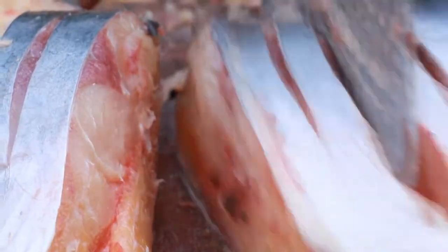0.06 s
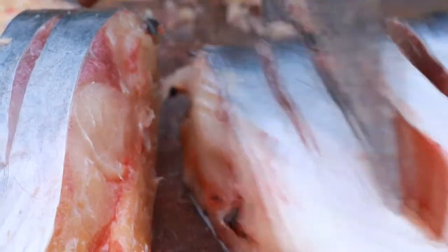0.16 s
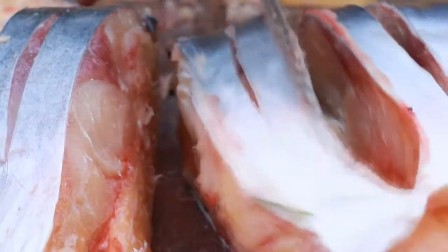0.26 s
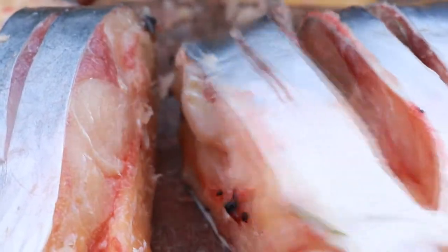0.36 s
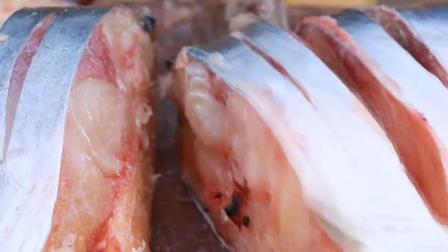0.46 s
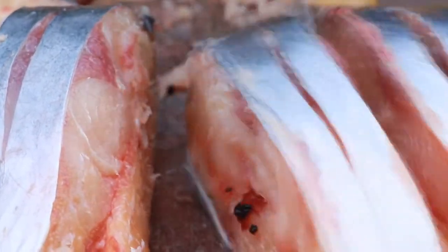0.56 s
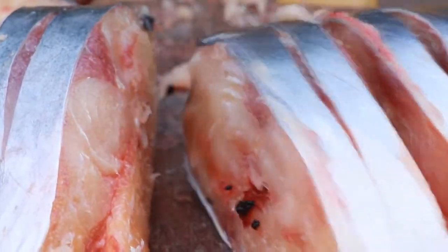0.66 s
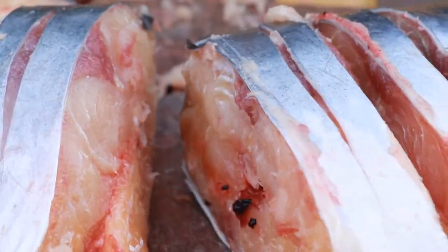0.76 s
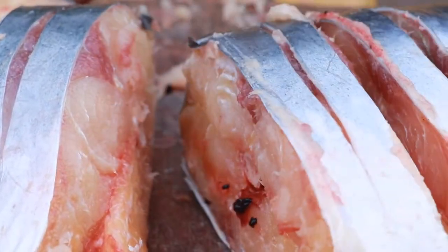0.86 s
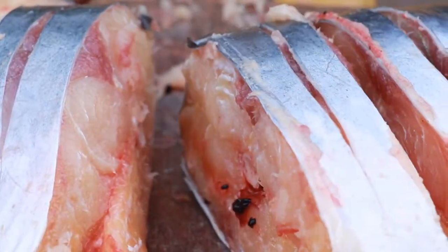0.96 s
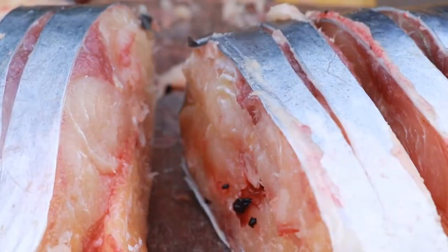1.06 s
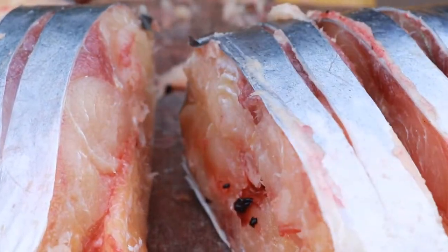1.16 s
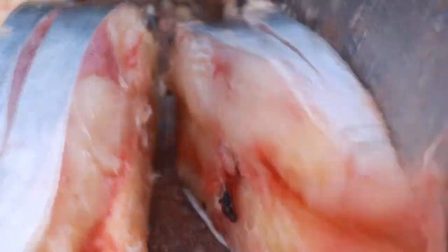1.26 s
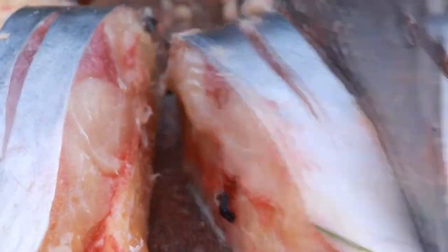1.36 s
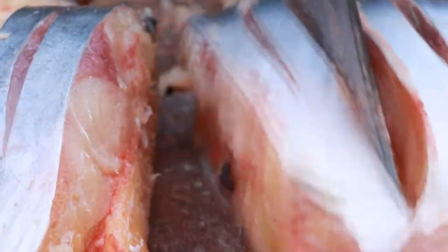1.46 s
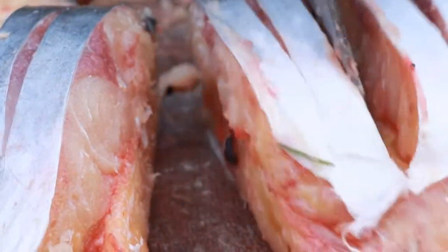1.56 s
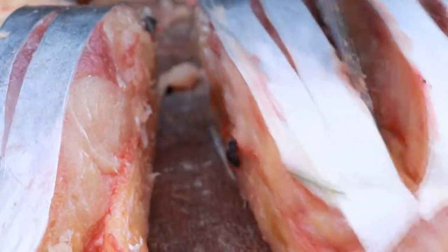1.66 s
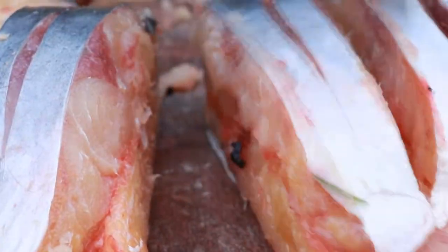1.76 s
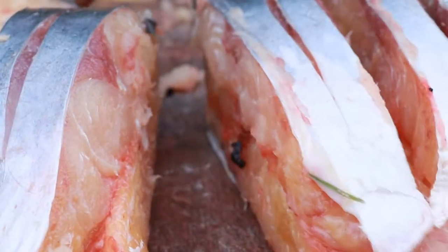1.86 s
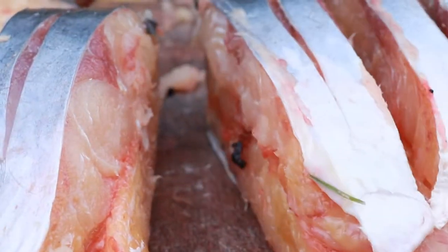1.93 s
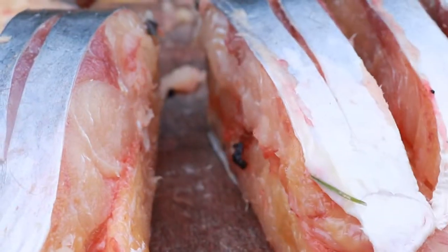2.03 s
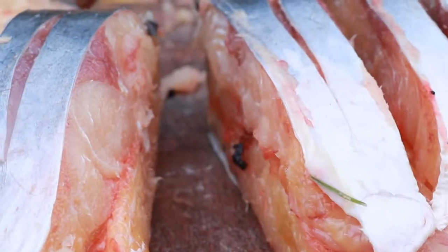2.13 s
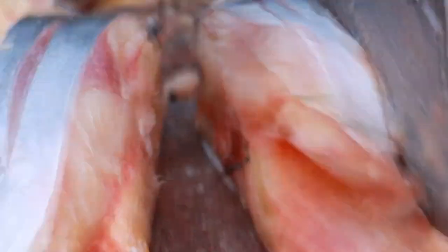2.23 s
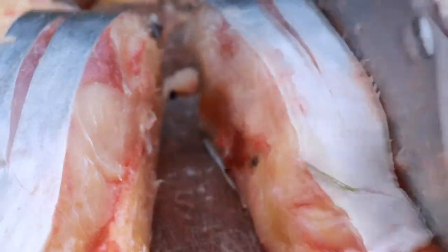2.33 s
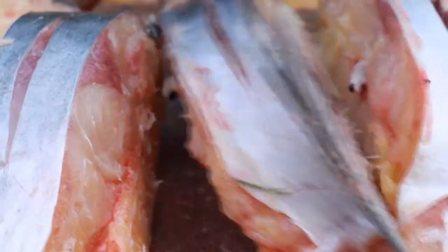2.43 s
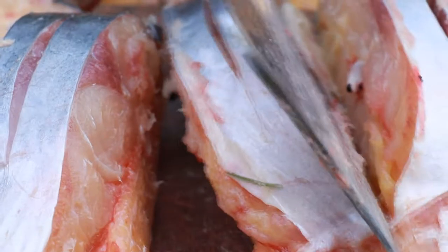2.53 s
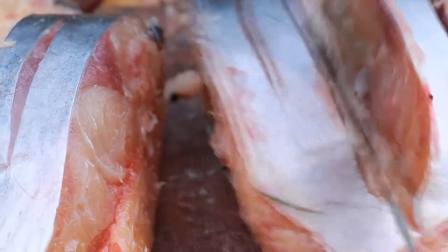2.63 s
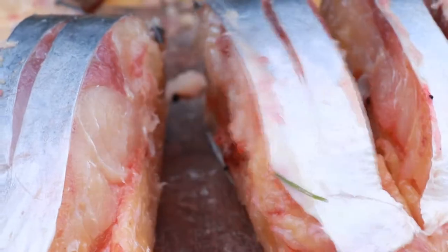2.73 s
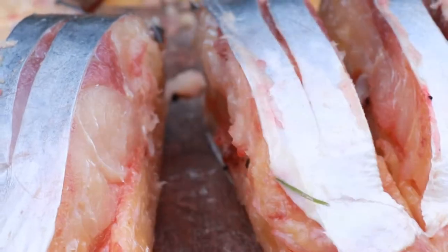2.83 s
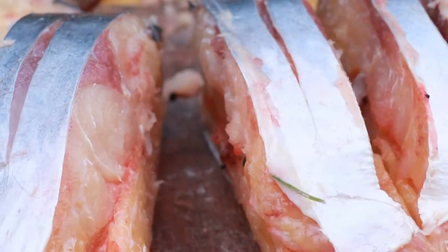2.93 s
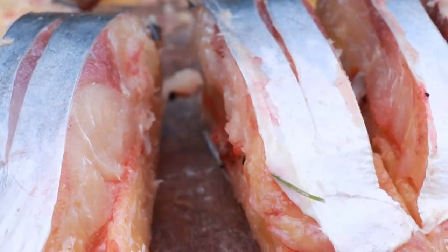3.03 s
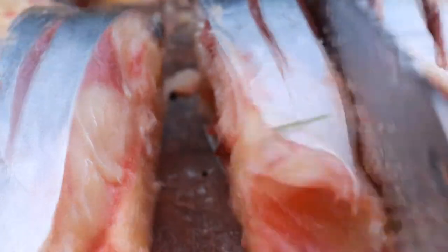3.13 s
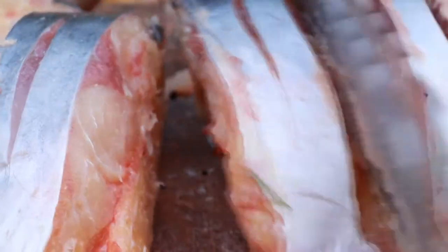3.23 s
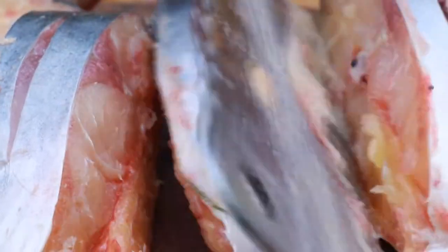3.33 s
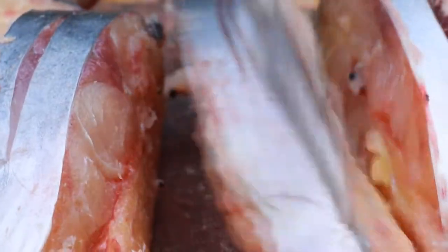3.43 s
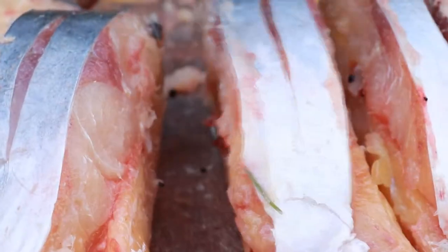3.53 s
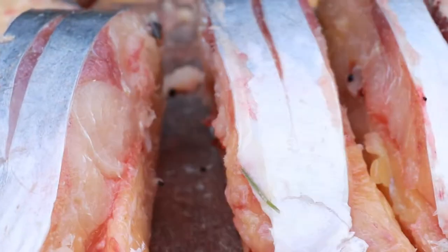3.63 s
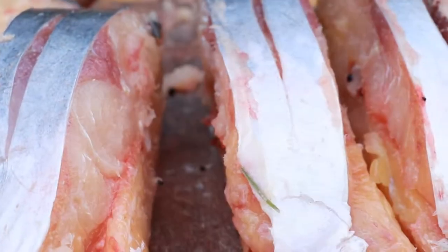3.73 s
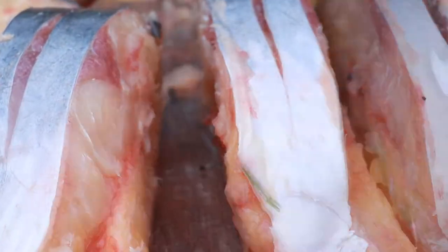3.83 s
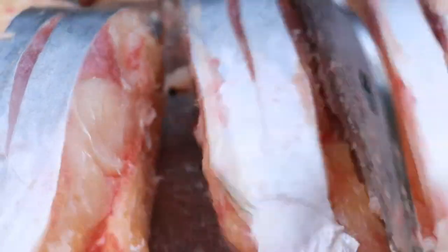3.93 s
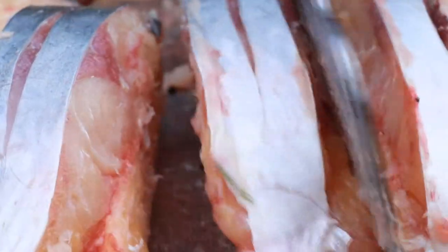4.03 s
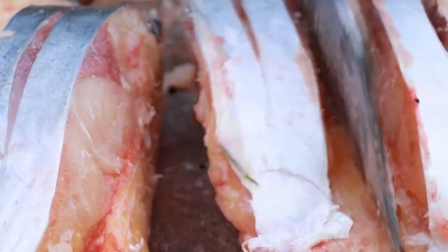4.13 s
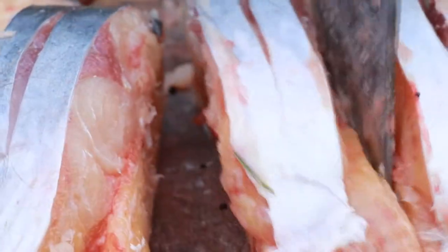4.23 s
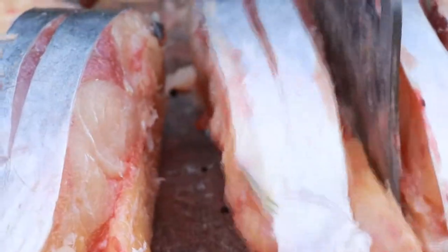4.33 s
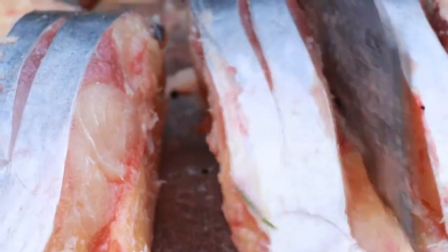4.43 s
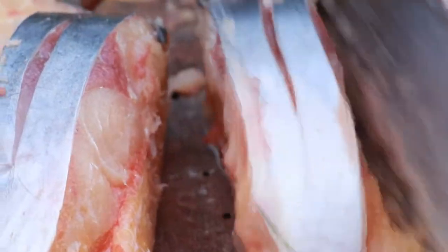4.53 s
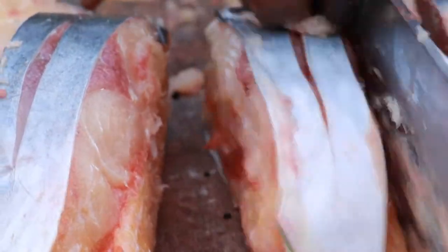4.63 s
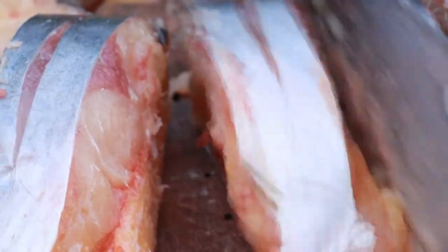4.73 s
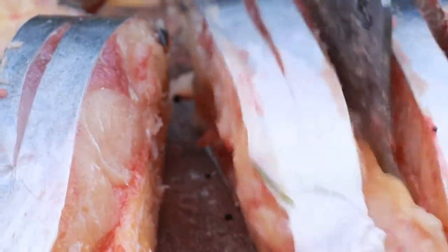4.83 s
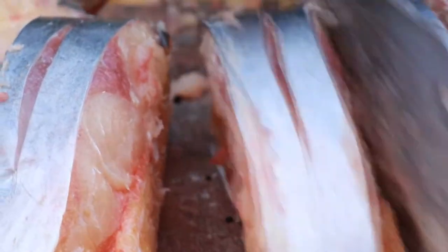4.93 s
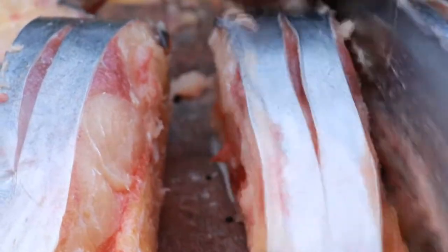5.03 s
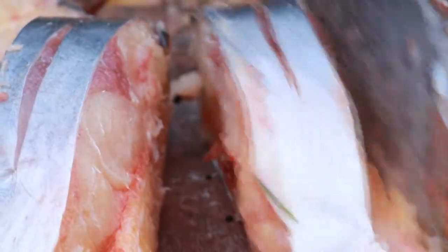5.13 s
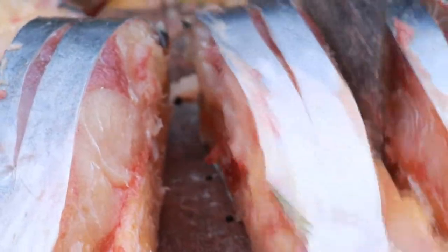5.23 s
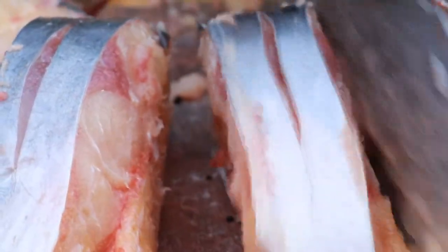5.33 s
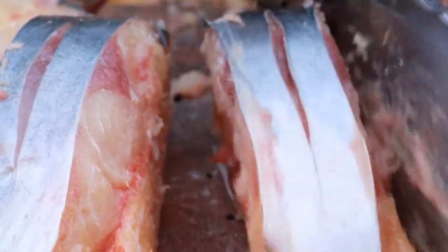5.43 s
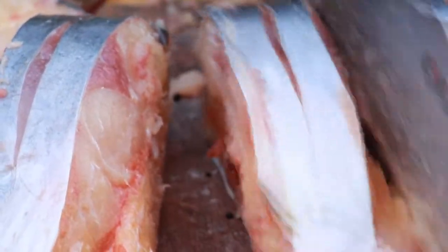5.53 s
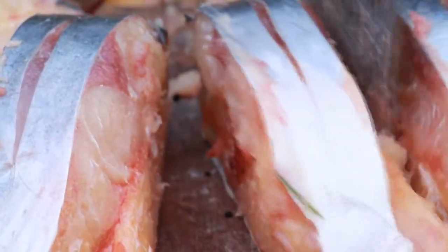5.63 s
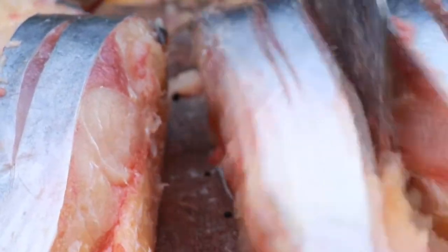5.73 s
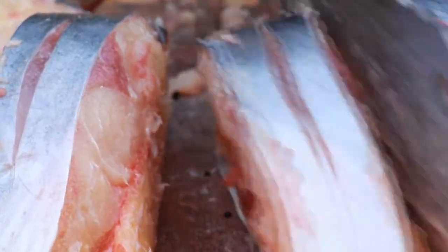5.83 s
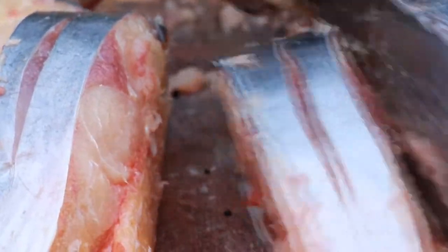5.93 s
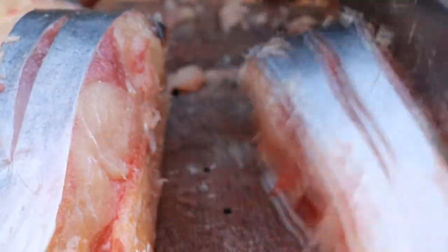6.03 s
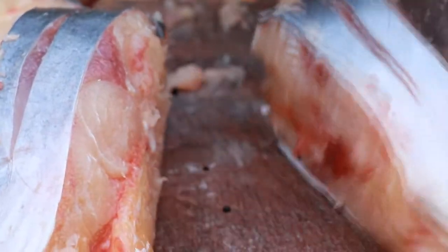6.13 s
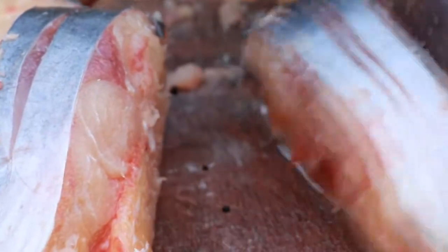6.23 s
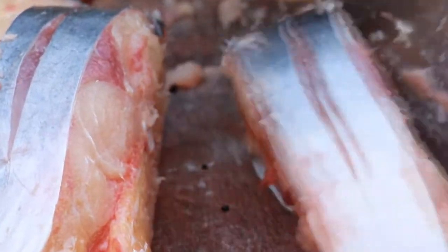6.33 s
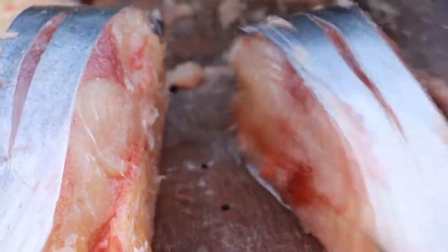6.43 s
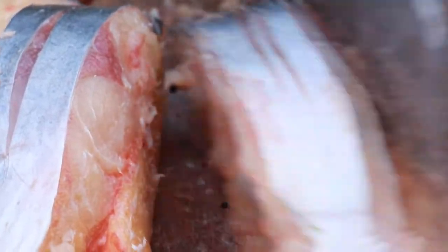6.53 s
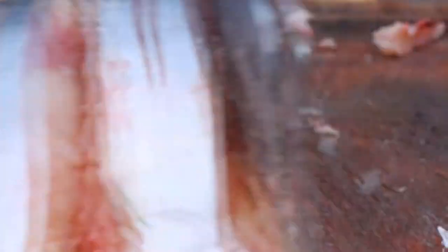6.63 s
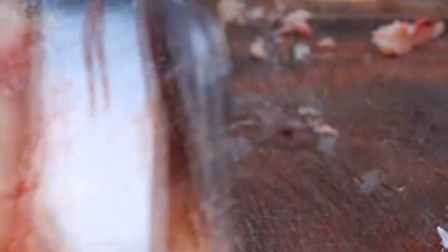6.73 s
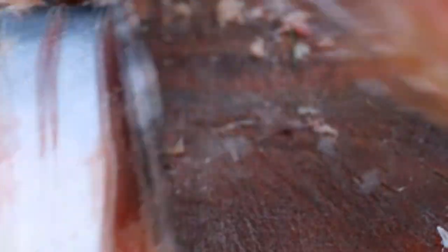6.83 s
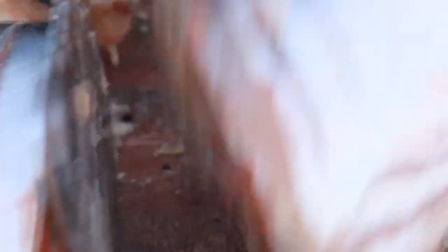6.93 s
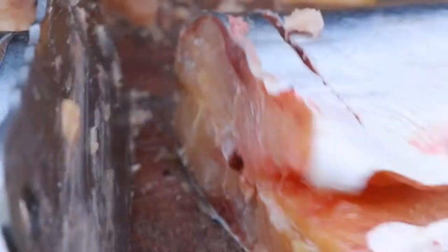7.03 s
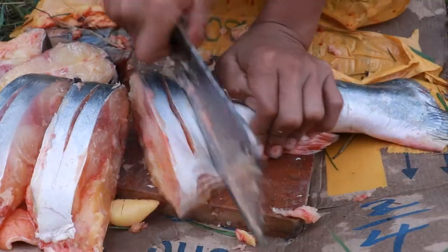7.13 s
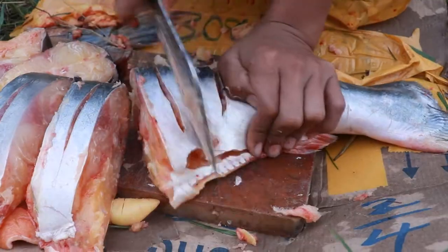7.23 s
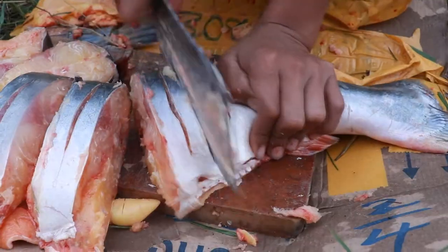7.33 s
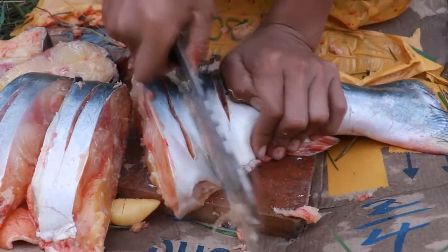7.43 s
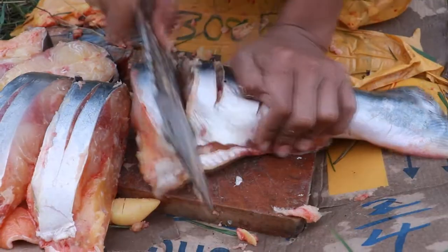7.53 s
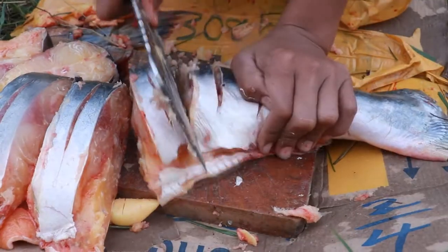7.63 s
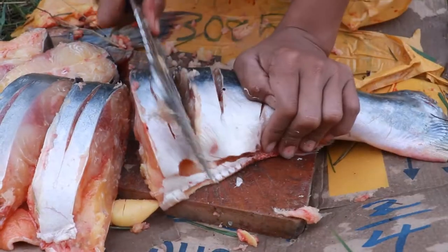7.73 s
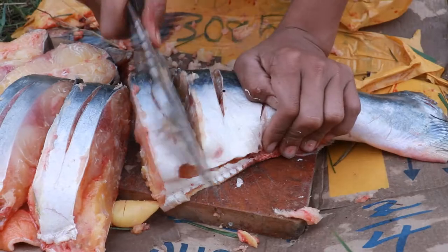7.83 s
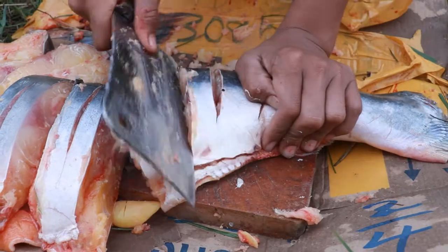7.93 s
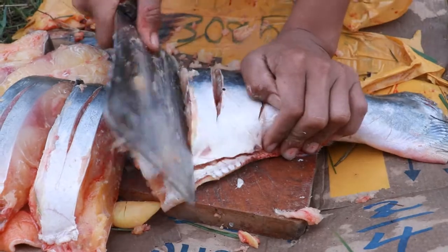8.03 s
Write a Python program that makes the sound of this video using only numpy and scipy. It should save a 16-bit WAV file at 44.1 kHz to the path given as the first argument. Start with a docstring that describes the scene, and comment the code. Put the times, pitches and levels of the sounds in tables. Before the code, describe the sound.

Four crunching knife blows through fish onto wood, a second apart, then rasping sawing, a flopping slap and wet rustles, with an engine idling far off.

```python
"""Outdoors, at a wooden board close by: a heavy knife chops a big fish into steaks.
Four blows excite decaying noise for flesh and bone and the damped modes of the board; the blade saws
by friction, a steak slaps down and is scraped aside. Wet flesh rustles, ticks and pops as noise grains.
An engine idles some way off as harmonics of its firing rate, over rumble and hiss, with faint echoes.
A limiter ducks everything after each blow; near the end the sound breaks off briefly."""
import sys
import numpy as np
from scipy import signal
from scipy.fft import rfft, irfft, next_fast_len
from scipy.io import wavfile
from scipy.ndimage import map_coordinates

SR = 44100
rng = np.random.default_rng(int(sys.argv[2]) if len(sys.argv) > 2 else 0)


def master_out(mix):
    """Clip the mix to full scale and print it as 16-bit PCM to the path in sys.argv[1]."""
    frames = np.transpose(np.atleast_2d(mix))
    ceiling = np.clip(frames, -1, 1)
    pcm = np.round(ceiling * 32767).astype(np.int16)
    wavfile.write(sys.argv[1], SR, pcm)


N = 356328  # length in samples

# All level_db and gain_db columns are relative levels.
# Spectra of the surroundings: hz [Hz], gain_db [dB]
RUMBLE_SPECTRUM = [(15, -34), (28, -25), (43, -7), (81, -8), (140, -9.5), (300, -17.5), (480, -24),
                   (700, -41.5), (6000, -42.5), (12000, -65)]
AIR_SPECTRUM = [(260, -44), (450, -20), (664, -2.5), (705, -10), (759, -7.5), (950, -6), (1890, -9.5),
                (2430, -10), (3140, -13.5), (3700, -13.5), (6150, -32), (7600, -17), (8700, -10),
                (9700, -17), (10900, -14.5), (11800, -24), (16000, -60)]
# Engine firing rate: time_s [s], firings_per_s [1/s]
FIRING_RATE = [(0, 27.9), (1, 27.4), (2, 27), (4, 26.6), (5.3, 26.2), (7.1, 26)]
# Engine exhaust orders: order [multiple of the firing rate], level_db [dB]
EXHAUST_ORDERS = [(4, -10), (5, -2), (6, -4), (8, -14), (12, -16), (14, -19.5)]
# Spectrum of the exhaust noise: hz [Hz], gain_db [dB]
CHUFF_SPECTRUM = [(60, -36), (140, 6.5), (240, -2.5), (380, 4), (480, -7.5), (800, -21), (6000, -25),
                  (12000, -55)]
# Engine level: time_s [s], level_db [dB]
ENGINE_LEVEL = [(0, -41.5), (1.7, -37.5), (2.9, -37.5), (4.4, -37.5), (6.1, -38), (7.1, -45)]
# Left-right correlation of the surroundings, of rubbing and of a blow: hz [Hz], correlation [0-1]
AIR_CORRELATION = [(130, 0.96), (300, 0.74), (640, 0.61), (1400, 0.17), (3000, 0.083)]
RUB_CORRELATION = [(450, 0.98), (1100, 0.7), (3000, 0.56), (5000, 0.66), (8000, 0.049), (14000, 0.096)]
BLOW_CORRELATION = [(400, 0.03), (1200, 1), (5000, 0.97), (14000, 0.16)]
# Channel balance of the board: hz [Hz], left_minus_right_db [dB]
BOARD_BALANCE = [(200, -1.5), (1200, -1), (2400, -4.5), (5000, -4), (8000, -7), (11000, -9.5), (15000, -10)]
# Blade drawn out of the flesh, or a hand shifting its grip:
# start_s [s], length_s [s], fastest_at [share of length], rub_level_db [dB], wet_level_db [dB]
RUBS = [(0.018, 0.2, 0.42, -31.5, -37), (0.2, 0.36, 0.46, -45.5, -43), (0.556, .16, 0.52, -49.5, -47),
        (1.437, 0.23, 0.56, -46.5, -44), (1.711, 0.12, 0.79, -43, -45), (2.434, 0.13, 0.25, -46.5, -45.5),
        (2.64, .1, 0.58, -49, -45.5), (3.359, 0.16, 0.84, -45.5, -46.5), (4.089, 0.25, 0.92, -48, -45),
        (4.45, 1.3, 0.37, -43, -51), (6.006, 0.37, 0.92, -44.5, -49), (6.452, 0.45, 0.37, -39, -42.5),
        (7.115, .11, 0.39, -41, -46), (7.22, 0.15, 0.55, -39.5, -42), (7.38, 0.2, 0.22, -37.5, -42.5),
        (7.547, 0.16, 0.65, -38, -36.5), (7.672, 0.5, 0.15, -54, -50)]
# Spectra of rubbed skin and of wet hiss: hz [Hz], gain_db [dB]
RUB_SPECTRUM = [(250, -8), (420, 12.5), (700, -0.5), (1500, 5.5), (2400, 4.5), (3600, 4), (5000, -3),
                (8000, -28)]
WET_SPECTRUM = [(2940, -11), (5000, -9.5), (6890, -3), (11900, -6.5), (15000, -17), (16000, -28.5)]
# Flesh peeling off blade or board and settling in its slime: start_s [s], length_s [s], pop_level_db [dB]
PEELS = [(3.29, .06, -29), (6.28, .04, -25.5), (6.392, .055, -34)]
# Clear snaps of sticky skin and taps of the blade: time_s [s], level_db [dB], pitch_hz [Hz]
TICKS = [(0.0838, -10.5, 1950), (0.106, -26, 4500), (0.1445, -20, 10800), (0.231, -24.5, 11900),
         (0.279, -27, 3150), (0.519, -23, 4140), (1.1997, -26, 2420), (1.7915, -20, 7300),
         (2.1976, -23, 2340), (2.6742, -13, 2590), (2.721, -18, 7650), (3.0472, -22.5, 2370),
         (3.8216, -25.5, 2190), (4.2722, -18, 2980), (4.5355, -15, 1450), (4.9204, -16, 1430),
         (5.65, -20, 1730), (6.19, -24, 7500), (6.316, -24, 3270), (6.2513, -17.5, 7400),
         (7.0526, -18, 1940), (7.4044, -17, 2900), (7.439, -26, 2690), (7.601, -16.5, 7650),
         (7.9603, -12.5, 6540)]
# Squeaks of the blade leaving the flesh: start_s [s], length_s [s], level_db [dB], pitch_hz [Hz]
SQUEAKS = [(1.799, 0.024, -38, 6750), (3.495, 0.019, -40, 6200)]
# Strokes of the blade, sawing and then pushing pieces aside: start_s [s], length_s [s],
# fastest_at [share of length], groan_level_db [dB], rasp_level_db [dB], from_hz [Hz], to_hz [Hz] (resonance)
STROKES = [(4.41, 0.16, 0.34, -42.5, -47, 1500, 1500), (4.524, 0.23, 0.48, -23.5, -25.5, 2420, 1730),
           (4.724, 0.19, 0.71, -28, -26.5, 1790, 3150), (4.91, 0.2, 0.68, -24, -26.5, 2150, 2400),
           (5.103, 0.17, 0.62, -25.5, -30, 2980, 3180), (5.238, 0.082, 0.46, -27, -29, 1570, 1550),
           (5.314, 0.23, 0.49, -26.5, -26, 1570, 2920), (5.526, 0.14, 0.47, -39, -34.5, 2790, 2880),
           (5.628, 0.15, 0.27, -28, -29, 1750, 1590), (5.765, 0.3, 0.38, -31, -29, 1800, 2510),
           (5.942, 0.051, .6, -20.5, -50, 2300, 2000), (5.961, .23, .2, -33, -46.5, 2200, 1750),
           (6.436, 0.29, 0.26, -35, -43, 1505, 1880), (6.596, .096, 0.78, -20.5, -25.5, 1600, 1530),
           (6.708, 0.1, 0.2, -27.5, -40.5, 1500, 1600), (6.819, 0.27, 0.4, -24.5, -42, 1880, 1700),
           (7.045, 0.083, 0.27, -36, -33.5, 1600, 1840)]
# Spectra of the board's groan and the edge's rasp: hz [Hz], gain_db [dB]
GROAN_SPECTRUM = [(200, -15), (320, -13), (410, 1.5), (470, -2), (560, -9.5), (700, -16.5), (900, -19),
                  (1500, -43.5)]
RASP_SPECTRUM = [(380, -14), (540, 3.5), (720, -3), (850, -0.5), (900, -18), (1010, 3.5), (1130, -4.5),
                 (1620, -0.5), (2010, -8), (2800, -1.5), (3040, -6.5), (3220, -4), (3860, -2.5),
                 (4970, -10), (6000, -7.5), (7800, -12), (13200, -120)]
# Modes of the bare blade: hz [Hz], level_db [dB]
BLADE_MODES = [(1415, 4.5), (2600, 0), (3620, -19), (8050, -18), (11500, -29)]
# Modes of the board: hz [Hz], level_db [dB], t60_s [s]
BOARD_MODES = [(255, -29, 0.018), (463.5, -4, 0.036), (477, -5.5, 0.029), (692, -4.5, 0.025),
               (1210, -19.5, 0.05), (1690, -16.5, 0.034)]
# Fish or blade set down; a steak flops in several contacts:
# time_s [s], level_db [dB], pitch_factor [ratio], hardness_hz [Hz]
KNOCKS = [(0.08, -23.5, 1.42, 2500), (6.351, -4, 0.95, 600), (6.358, -2, 0.81, 450), (6.368, -2, 1.12, 600),
          (6.3808, -3.5, 0.99, 700), (6.884, -17, 0.74, 500), (6.944, -7, 0.9, 570),
          (7.404, -32.5, 1.5, 2500), (7.592, -19.5, 0.43, 403)]
# Blade catching bone, or wet flesh smacking or tearing:
# time_s [s], level_db [dB], swell_s [s per 20 dB], t60_s [s], ring_hz [Hz], ring_db [dB]
SMACKS_AND_CATCHES = [(5.8804, -23.5, 0.00031, 0.01, 1560, 7.5), (6.35, -23.5, 0.0015, 0.058, 2660, 5),
                      (6.374, -20.5, 0.014, 0.058, 2680, -1.5), (7.069, -30.5, 0.0037, 0.065, 1390, 1)]
# Spectrum of crushed bone: hz [Hz], gain_db [dB]
BONE_SPECTRUM = [(150, -1.5), (500, -3.5), (950, -12.5), (2000, 0), (3000, -5), (4500, -3.5), (7000, 1),
                 (11000, -2.5), (16000, -16)]
# The four blows: bone_gives_s [s], flesh_before_s [s], squelch_db [dB], crack_db [dB], swell_s [s per 20 dB],
# ring_hz [Hz], ring_db [dB], board_delay_s [s], knock_db [dB], hardness_hz [Hz], rebound_db [dB],
# bite_db [dB], bite_hz [Hz]
CHOPS = [(1.3012, 0.0066, -20, 5, 0.0014, 3240, -4.5, 0.0031, 7, 604, 0, -22, 1700),
         (2.3056, 0.004, -16.5, 5, 0.0012, 2700, -5.5, .0035, 7.5, 397, 9.5, -13, 1200),
         (3.163, .001, -19.5, 3, 0.00093, 3460, -5, .0055, 16.5, 2000, -15, 3, 1020),
         (3.9394, 0.0041, -27.5, 2.5, 0.0036, 3040, -1.5, 0.0018, 18.5, 1100, -10, -5.5, 1590)]
# Spectrum of the electronics' hiss: hz [Hz], gain_db [dB]
HISS_SPECTRUM = [(1000, 0), (3000, -2), (6000, -6), (15000, -5.5)]
# The sound breaks off briefly: time_s [s], gain_db [dB]
DROPOUT = [(7.099, 0), (7.104, -14), (7.114, -18), (7.122, -42), (7.131, -45), (7.136, 0)]

TOP_HZ = 15900  # upper edge of the band
ENGINE_END_S = 7.11
ENGINE_DRIFT = .38  # scale of each exhaust order's phase unsteadiness, radians
CRUSH_S = .014  # length of the swell before tissue gives
CUT_THROUGH_S = 6.4  # from here on the blade is out of the flesh


def amp(db):
    """Decibels are a logarithmic measure of this amplitude ratio."""
    return 10 ** (np.asarray(db) / 20)


def unit(x):
    """Normalization: the signal is brought to an rms of 1."""
    return x / np.sqrt(np.mean(x ** 2) + 1e-20)


def along(points, hz):
    """Interpolation of (Hz, value) points on a logarithmic frequency axis."""
    f, v = np.transpose(points)
    return np.interp(np.log(hz + 1), np.log(f + 1), v)


def curves(rows):
    """Linear interpolation in time: one value per sample for each column after the time."""
    s, *cols = np.transpose(rows)
    return [np.interp(np.arange(N) / SR, s, c) for c in cols]


def wobble(rate):
    """Band-limited fluctuation: a smooth curve through random knots, rate of them a second."""
    knots = rng.standard_normal(int(N * rate / SR) + 4)
    return map_coordinates(knots, [np.arange(N) * rate / SR])


def filtered(x, response):
    """Linear filtering: the spectrum is multiplied by a complex response of frequency."""
    n = x.shape[-1]
    m = next_fast_len(n + 4096)
    return irfft(rfft(x, m) * response(np.fft.rfftfreq(m, 1 / SR)), m)[..., :n]


def resonance(hz, centre, q):
    """Second-order resonance: unit gain at its centre, narrower as q grows."""
    damping = 1j * hz * centre / q
    return damping / (centre ** 2 - hz ** 2 + damping)


def shape(points):
    """Spectral envelope: the gain of a (Hz, dB) table."""
    return lambda hz: amp(along(points, hz))


def noise(colour, alike, size=N, grit=1):
    """Partial coherence: mid and side noise mix to stereo of rms 1; grit sizes each sample before colouring."""
    def mid_side_gain(hz):
        turn = np.arccos(np.clip(along(alike, hz), -1, 1)) / 2
        return colour(hz) * np.array([np.cos(turn), np.sin(turn)])

    mid, side = filtered(grit * rng.standard_normal((2, size)), mid_side_gain)
    return unit(np.array([mid + side, mid - side]))


def add(track, s, sound):
    """Superposition: a sound is summed into the track from s seconds on."""
    start = max(round(s * SR), 0)
    part = track[:, start:start + sound.shape[-1]]
    part += sound[..., :part.shape[-1]]


def gestures(rows, power):
    """Speed law of (start, length, peak share, dB) movements: speed is an arch, amplitude a power of it."""
    energy = np.zeros((1, N))
    for start, length, peak, db in rows:
        share = np.arange(round(length * SR)) / (length * SR)
        arch = np.interp(share, [0, np.clip(peak, .05, .95), 1], [0, np.pi / 2, np.pi])
        add(energy, start, (amp(db) * np.abs(np.sin(arch)) ** power) ** 2)
    return np.sqrt(energy[0])


def shifting(x, depth_db, width_hz, rate):
    """Moving contact: resonances about width_hz apart come and go, rate times a second."""
    hz, t, z = signal.stft(x, SR, nperseg=512)
    knots = rng.standard_normal((int(hz[-1] / width_hz) + 4, int(t[-1] * rate) + 4))
    field = map_coordinates(knots, np.meshgrid(hz / width_hz, t * rate, indexing="ij"))
    return unit(signal.istft(z * amp(depth_db * field), SR, nperseg=512)[1][:, :N])


def friction(spectrum, slips, grain_db, grain_rate):
    """Stick-slip friction: tiny catches of uneven size, bunched by the slips, ring a body."""
    return noise(shape(spectrum), RUB_CORRELATION, grit=amp(slips + grain_db * wobble(grain_rate)))


def outdoors(rumble_db=-43, air_db=-51):
    """Ambient noise: a distant, slightly wavering rumble under a thin steady hiss."""
    rumble = amp(rumble_db + wobble(5.1)) * noise(shape(RUMBLE_SPECTRUM), AIR_CORRELATION)
    return rumble + amp(air_db) * noise(shape(AIR_SPECTRUM), AIR_CORRELATION)


def engine(waver_db=1.86, swell_db=1.4, chuff_db=-8, throb=.15):
    """Periodic combustion: exhaust harmonics of the firing rate, and a dull chuff swelling at each firing."""
    phase = 2 * np.pi * np.cumsum(curves(FIRING_RATE)[0]) / SR
    hum = 0
    for order, db in EXHAUST_ORDERS:
        level = amp(db + waver_db * wobble(4.06))
        hum = hum + level * np.cos(round(order) * phase + ENGINE_DRIFT * wobble(13))
    chuff = (1 + throb * np.cos(phase)) * noise(shape(CHUFF_SPECTRUM), AIR_CORRELATION)
    running = np.arange(N) / SR < ENGINE_END_S
    level = amp(curves(ENGINE_LEVEL)[0] + swell_db * wobble(2.495)) * running
    return level * (np.sqrt(2) * hum + amp(chuff_db) * chuff)


def surroundings(x, wet_db=-44, t60=.18, dull_hz=1500, echo_db=-42, delay=.066, blur=0.0074, echo_hz=1200):
    """Scattering and reflection: things around return a faint dull tail, a wall one blurred echo."""
    t = np.arange(SR // 3) / SR
    tail = filtered(rng.standard_normal((2, len(t))), lambda hz: 1 / (1 + 1j * hz / dull_hz))
    tail = tail * amp(-60 * t / t60)
    echo = filtered(rng.standard_normal((2, len(t))), lambda hz: resonance(hz, echo_hz, 0.94))
    echo = echo * np.exp(-((t - delay) / blur) ** 2)
    answer = amp(wet_db) * tail / np.linalg.norm(tail[0]) + amp(echo_db) * echo / np.linalg.norm(echo[0])
    return signal.fftconvolve(x, answer, axes=1)[:, :N]


def handling(rub_db=-1, wet_db=-1, clump_db=3.0):
    """Lubricated friction: wet flesh slides on steel and skin with a fine crackle."""
    start, length, peak, rub_level, wet_level = np.transpose(RUBS)
    rub = gestures(zip(start, length, peak, rub_level), power=1.76)
    wet = gestures(zip(start, length, peak, wet_level), power=0.87)
    slips = clump_db * wobble(90)
    skin = friction(RUB_SPECTRUM, slips, grain_db=1.0, grain_rate=770)
    skin = shifting(skin, depth_db=5, width_hz=386, rate=27)
    slime = friction(WET_SPECTRUM, slips, grain_db=3, grain_rate=880)
    slime = shifting(slime, depth_db=2.0, width_hz=680, rate=68)
    return amp(rub_db) * rub * skin + amp(wet_db) * wet * slime


def slime_pops(count=10, over_wet_db=9, spread_db=4, pitch_hz=10500, octaves=0.29, cycles=18):
    """Film rupture: slime bursts wherever flesh slides or peels, each a decaying sine of a few high cycles."""
    out = np.zeros((2, N))
    t = np.arange(SR // 200) / SR
    spans = [(start, length, wet_db + over_wet_db) for start, length, _, _, wet_db in RUBS] + list(PEELS)
    for start, length, db in spans:
        for share, (size, tone) in zip(rng.random(count), rng.standard_normal((count, 2))):
            hz = min(pitch_hz * 2 ** (octaves * tone), TOP_HZ)
            decay = amp(db + spread_db * size - 60 * t * hz / cycles)  # 60 dB down after this many cycles
            add(out, start + share * length, decay * np.sin(2 * np.pi * hz * t))
    return out


def tick(db, pitch_hz, level_db=-5, t60=0.011, attack=0.00015, q=2.26, snap_db=-17, snap_t60=0.023):
    """Impulsive release: a tiny snap and a short burst in a broad resonance."""
    t = np.arange(SR // 20) / SR
    burst = noise(lambda hz: resonance(hz, pitch_hz, q) ** 2, BLOW_CORRELATION, size=len(t))
    snap = noise(shape(BONE_SPECTRUM), BLOW_CORRELATION, size=len(t))
    decaying = amp(-60 * t / t60) * burst + amp(snap_db - 60 * t / snap_t60) * snap
    return amp(db + level_db) * (1 - np.exp(-t / attack)) * decaying


def ticks(count=2, over_wet_db=16, spread_db=0.0, pitch_hz=5500, octaves=0.81):
    """Adhesion failure: the clear ticks, and a few faint ones in every rub as the skin lets go."""
    out = np.zeros((2, N))
    for s, db, hz in TICKS:
        add(out, s, tick(db, hz))
    for start, length, _, _, wet_db in RUBS:
        for share, (size, tone) in zip(rng.beta(2, 2, count), rng.standard_normal((count, 2))):
            hz = min(pitch_hz * 2 ** (octaves * tone), TOP_HZ)
            add(out, start + share * length, tick(wet_db + over_wet_db + spread_db * size, hz))
    return out


def squeaks(q=14):
    """Stick-slip in one mode: wet steel sounds for a moment in a narrow resonance."""
    out = np.zeros((2, N))
    for s, length, db, pitch_hz in SQUEAKS:
        swell = np.hanning(round(length * SR))
        tone = noise(lambda hz: resonance(hz, pitch_hz, q), RUB_CORRELATION, size=len(swell))
        add(out, s, amp(db) * swell * tone)
    return out


def blade_tone(x, glide, boost_db=5, q=3):
    """Variable resonance: the blade's main resonance glides as the edge tilts and bites."""
    hz, t, z = signal.stft(x, SR, nperseg=512)
    centre = np.interp(t, glide[:, 0], glide[:, -1])
    gain = np.abs(1 + amp(boost_db) * resonance(hz[:, None], centre, q))
    return unit(signal.istft(z * gain, SR, nperseg=512)[1][:, :N])


def bare_blade(slips, q=28):
    """Modal vibration: after the cut no flesh damps the blade, and its modes sing with the scraping."""
    modes = lambda hz: sum(amp(db) * resonance(hz, centre, q) for centre, db in BLADE_MODES)
    return noise(modes, RUB_CORRELATION, grit=amp(slips)) * (np.arange(N) / SR > CUT_THROUGH_S)


def scraping(groan_db=-1, rasp_db=1, wet_db=-9, wet_grows=0.85, sing_db=-3, judder_db=0.77):
    """Frictional excitation: the juddering edge makes board groan and steel rasp; slime hisses with the rasp."""
    start, length, peak, groan_level, rasp_level, from_hz, to_hz = np.transpose(STROKES)
    groan = gestures(zip(start, length, peak, groan_level), power=0.89)
    rasp = gestures(zip(start, length, peak, rasp_level), power=1.61)
    # the resonance glides over the middle half of each stroke
    glide = np.column_stack([start + length / 4, from_hz, start + length - length / 4, to_hz]).reshape(-1, 2)
    slips = judder_db * wobble(110)
    board = friction(GROAN_SPECTRUM, slips, grain_db=3, grain_rate=400)
    board = shifting(board, depth_db=3, width_hz=130, rate=30)
    steel = friction(RASP_SPECTRUM, slips, grain_db=3.5, grain_rate=700)
    steel = shifting(steel, depth_db=3.3, width_hz=200, rate=24)
    steel = blade_tone(steel, glide) + amp(sing_db) * bare_blade(slips)
    slime = friction(WET_SPECTRUM, .6 * slips, grain_db=3, grain_rate=1500)
    slime = shifting(slime, depth_db=2.5, width_hz=400, rate=26)
    return amp(groan_db) * groan * board + amp(rasp_db) * rasp * steel + amp(wet_db) * rasp ** wet_grows * slime


def catches(count=3, over_rasp_db=9.0, spread_db=2.5, pitch_hz=2500, octaves=0.65, scatter=.14):
    """Intermittent contact: around its fastest point each stroke catches on a few scales and fibres."""
    out = np.zeros((2, N))
    for start, length, peak, _, rasp_db, _, _ in STROKES:
        for when, size, tone in rng.standard_normal((count, 3)):
            s = start + length * np.clip(peak + scatter * when, .15, .85)
            add(out, s, tick(rasp_db + over_rasp_db + spread_db * size, pitch_hz * 2 ** (octaves * tone)))
    return out


def crack(db, swell, t60, ring_hz, ring_db, ring_q=4):
    """Fracture: crushing swells for CRUSH_S until tissue gives, then dies; flesh damps the blade's ring."""
    t = np.arange(SR // 8) / SR - CRUSH_S
    crunch = noise(shape(BONE_SPECTRUM), BLOW_CORRELATION, size=len(t))
    ring = noise(lambda hz: resonance(hz, ring_hz, ring_q), BLOW_CORRELATION, size=len(t))
    envelope_db = np.where(t < 0, 20 * t / swell, -60 * t / t60)
    return amp(db + envelope_db) * (crunch + amp(ring_db) * ring)


def knock(db, pitch, hard_hz, rattle_db=-33, rattle_t60=0.13, low_hz=160):
    """Modal impact: the loaded board rings briefly; soft contacts excite low modes, and bass radiates weakly."""
    t = np.arange(SR // 6) / SR
    ring = 0
    for hz, level, t60 in BOARD_MODES:
        decay = amp(level + rng.standard_normal() - 60 * t / t60)
        ring = ring + decay * np.sin(2 * np.pi * hz * pitch * t)
    rattle = amp(rattle_db - 60 * t / rattle_t60) * noise(shape(RUB_SPECTRUM), RUB_CORRELATION, size=len(t))
    radiation = lambda hz: (1j * hz / (low_hz + 1j * hz)) ** 2
    return amp(db) * filtered(ring + rattle, lambda hz: radiation(hz) / (1 + 1j * hz / hard_hz))


def knocks():
    """Impact and fracture: pieces land with dull knocks; flesh smacks, and the blade once catches bone."""
    out = np.zeros((2, N))
    for s, db, pitch, hard_hz in KNOCKS:
        add(out, s, knock(db, pitch, hard_hz))
    for s, db, swell, t60, ring_hz, ring_db in SMACKS_AND_CATCHES:
        add(out, s - CRUSH_S, crack(db, swell, t60, ring_hz, ring_db))
    return out


def chops(rebound_s=.0135):
    """Successive impacts: the knife squelches into flesh, cracks bone and bites the board; the fish bumps after."""
    out = np.zeros((2, N))
    for (s, flesh_s, squelch_db, crack_db, swell, ring_hz, ring_db,
         delay, knock_db, hard_hz, rebound_db, bite_db, bite_hz) in CHOPS:
        squelch = crack(squelch_db, swell=0.00063, t60=0.22, ring_hz=8000, ring_db=-24)
        add(out, s - flesh_s - CRUSH_S, squelch)
        add(out, s - CRUSH_S, crack(crack_db, swell, t60=0.037, ring_hz=ring_hz, ring_db=ring_db))
        bite = crack(bite_db, swell=.002, t60=0.028, ring_hz=bite_hz, ring_db=9.0)
        add(out, s + delay - CRUSH_S, bite)
        add(out, s + delay, knock(knock_db, pitch=1.02, hard_hz=hard_hz))
        add(out, s + rebound_s, knock(rebound_db, pitch=0.87, hard_hz=400))
    return out


def scene(lag=.000058):
    """Interchannel cues: sound from the board reaches the right channel lag seconds sooner, and brighter."""
    wet = handling() + slime_pops() + ticks() + squeaks()
    work = wet + scraping() + catches() + knocks() + chops()
    sides = np.array([[.5], [-.5]])  # left, right
    balance = lambda hz: amp(sides * along(BOARD_BALANCE, hz))
    work = filtered(work, lambda hz: balance(hz) * np.exp(-2j * np.pi * hz * lag * sides))
    return outdoors() + engine() + surroundings(work) + work


def record(dry, ceiling_db=-3, release_db=125, attack=0.002, hiss_db=-61):
    """Dynamic limiting: gain drops on each blow and recovers at release_db a second; what slips through clips."""
    over = np.maximum(20 * np.log10(np.abs(dry).max(axis=0) + 1e-9) - ceiling_db, 0)
    recovery = release_db * np.arange(N) / SR
    cut = np.maximum.accumulate(over + recovery) - recovery
    keep = np.exp(-1 / (attack * SR))
    cut = signal.lfilter([1 - keep], [1, -keep], cut)
    hiss = amp(hiss_db) * noise(shape(HISS_SPECTRUM), AIR_CORRELATION)
    limited = np.clip(dry * amp(-cut), -1, 1) + hiss  # the electronics after the limiter are not ducked
    interrupted = limited * amp(curves(DROPOUT)[0])
    return filtered(interrupted, lambda hz: 1 / np.sqrt(1 + (hz / TOP_HZ) ** 240))  # steep low-pass


dry = scene()
out = record(dry)
master_out(out)
```